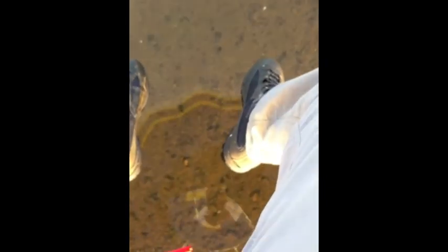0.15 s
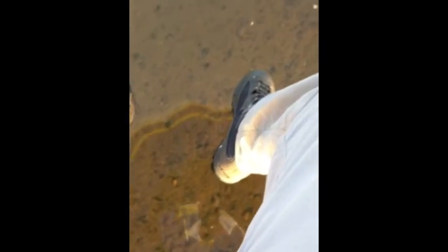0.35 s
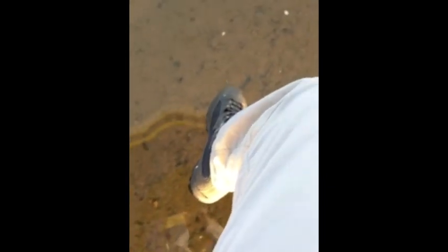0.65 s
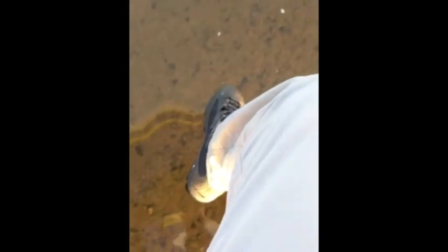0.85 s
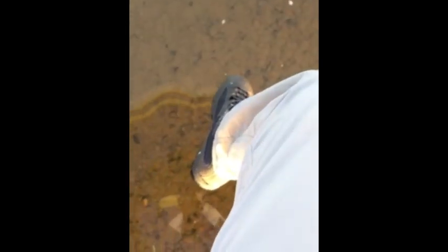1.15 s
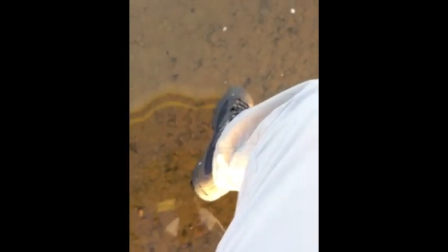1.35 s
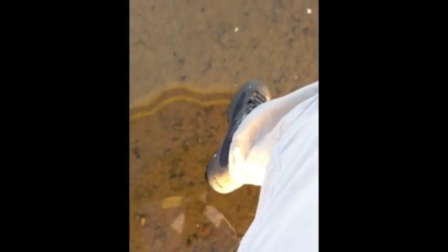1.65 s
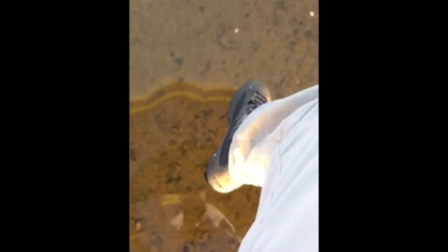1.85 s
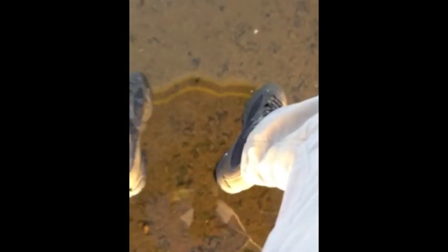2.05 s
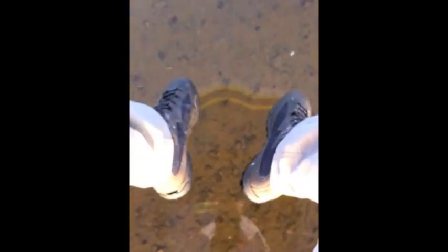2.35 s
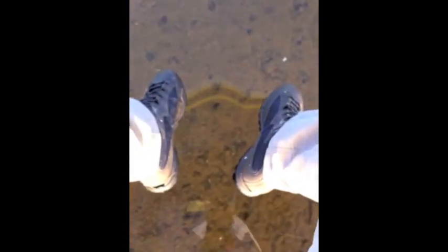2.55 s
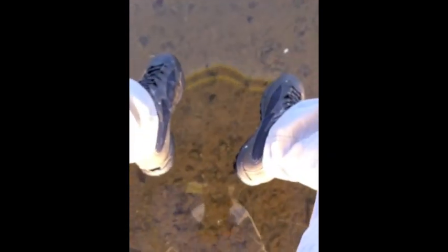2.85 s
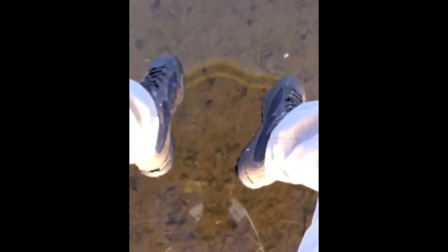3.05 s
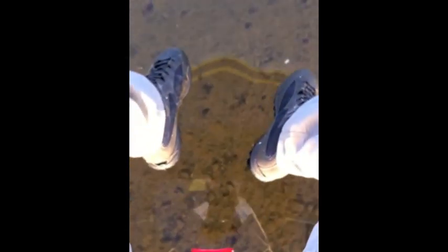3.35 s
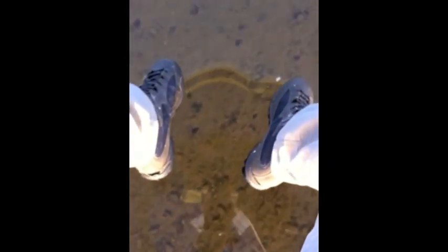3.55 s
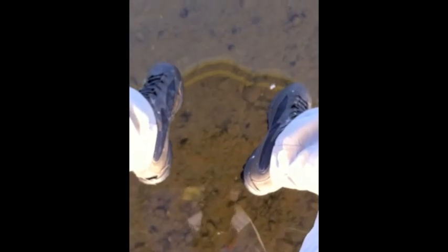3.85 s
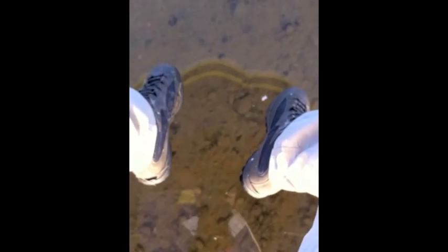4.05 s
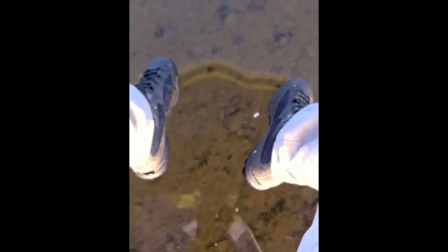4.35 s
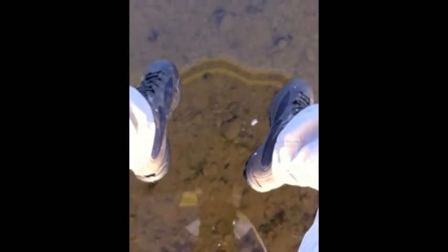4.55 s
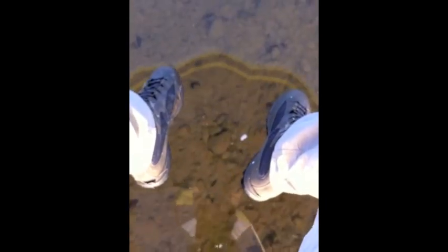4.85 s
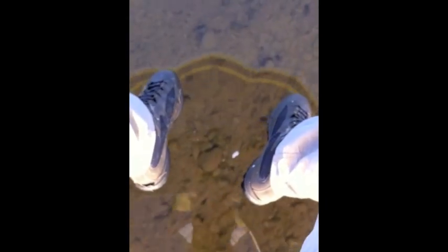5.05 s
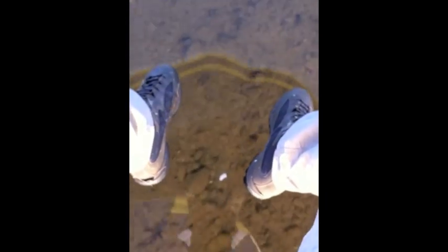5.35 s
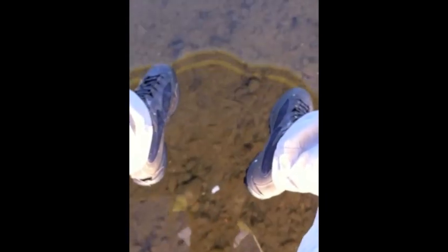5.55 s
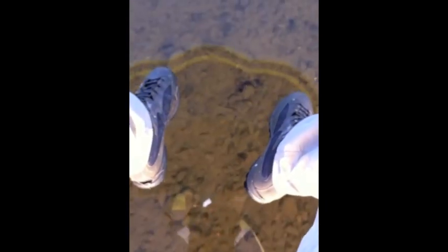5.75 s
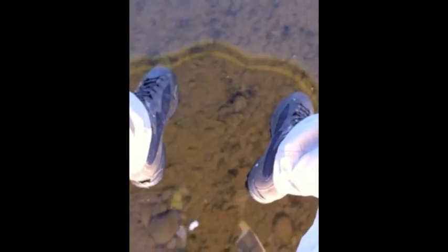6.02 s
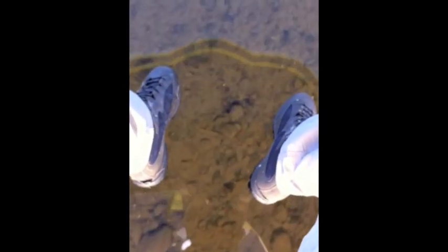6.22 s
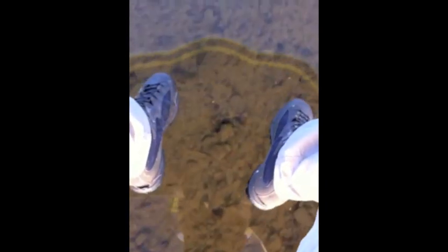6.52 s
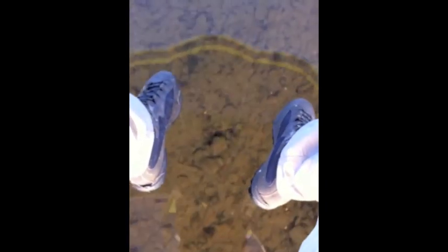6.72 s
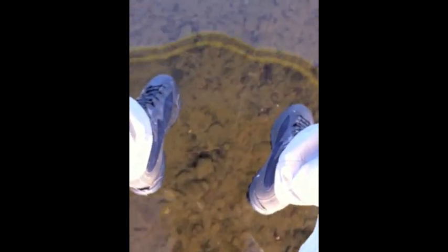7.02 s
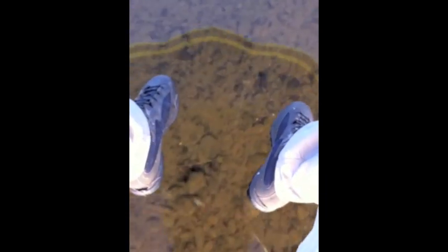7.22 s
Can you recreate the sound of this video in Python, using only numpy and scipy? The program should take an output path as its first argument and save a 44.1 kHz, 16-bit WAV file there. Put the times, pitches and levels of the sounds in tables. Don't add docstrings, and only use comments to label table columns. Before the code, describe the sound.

Repeated propane burner bursts outdoors: deep flame roar with rushing gas and high hiss, sharp ignition puffs, and two faint leaks between blasts.

```python
import sys
import numpy as np
from scipy import signal
from scipy.fft import rfft, irfft, next_fast_len
from scipy.io import wavfile
from scipy.ndimage import uniform_filter1d

SR = 44100
rng = np.random.default_rng(int(sys.argv[2]) if len(sys.argv) > 2 else 0)


def wav_out(sig):
    wavfile.write(sys.argv[1], SR, np.round(np.clip(np.atleast_2d(sig).T, -1, 1) * 32767).astype(np.int16))


def boost(x):
    u = np.asarray(x, float) / 20
    return 10 ** u


N = 325458
TIME = np.arange(N) / SR

# flame, shear, hiss [level/dB]
FULL_BURN_DB = (-15, -33, -28)


# [f/Hz, level/dB per Hz]
FLAME_ROAR = [(35, -88.5), (60, -74), (90, -59.5), (130, -45), (200, -37), (260, -38), (350, -43.5),
              (450, -48), (600, -46.5), (750, -51.5), (950, -54), (1200, -66.5), (1600, -67),
              (4000, -104.5)]


def flame(gusts, gust_db=0.43, flicker_db=1.16):
    level_db = control(column=1) - FULL_BURN_DB[0]
    unsteady_db = gust_db * gusts + flicker_db * wobble(10, 40)
    return coloured(FLAME_ROAR) * boost(level_db + unsteady_db)


# [f/Hz, level/dB per Hz]
GAS_SHEAR = [(300, -81), (600, -56), (900, -54.5), (1200, -56), (1700, -68), (2100, -62.5), (2500, -66),
             (4000, -70), (6300, -74), (9000, -75.5), (12000, -78.5), (15600, -91)]


def shear(gusts, gust_db=0.5):
    return coloured(GAS_SHEAR) * boost(control(column=2) - FULL_BURN_DB[1] + gust_db * gusts)


# [f/Hz, level/dB per Hz]
NOZZLE_HISS = [(2500, -88), (5000, -78.5), (7500, -74), (9000, -71.5), (10500, -67.5), (12000, -64),
               (13000, -63.5), (14000, -64.5), (15500, -69)]


def nozzles(gusts, gust_db=0.53, shear_treble_db=-10.5):
    treble = boost(control(column=3))
    rush = boost(control(column=2) + shear_treble_db)
    beyond = np.sqrt(np.maximum(treble ** 2 - rush ** 2, 0.05 * treble ** 2))
    return coloured(NOZZLE_HISS) * beyond * boost(gust_db * gusts - FULL_BURN_DB[2])


# [t/s, peak level/dB, pitch f/Hz, length t/s]
GAS_POCKETS = [
    (.112, -13, 234, .005),
    (2.606, -15, 205, 0.0035),
    (2.866, -8.5, 270, .006),
    (3.095, -6.5, 237, .006),
    (3.453, -7.5, 210, 0.0058),
    (4.628, -15, 202, .007),
    (4.772, -13.5, 230, 0.0055),
    (6.018, -7.5, 197, 0.0043),
    (4.622, -21.5, 80, 0.0072),
]


def puffs():
    thump = np.zeros(N)
    for s, db, hz, length in GAS_POCKETS:
        at, t = round(s * SR), TIME[:4000]
        swell = (t / length * np.exp(1 - t / length)) ** 2
        thump[at:at + len(t)] += boost(db) * swell * np.sin(2 * np.pi * hz * t)
    return thump


# [start t/s, end t/s, level/dB]
HALF_SHUT = [
    (4.18, 4.62, -41.5),
    (5.77, 6.0, -44),
]


def leaking():
    gain = np.zeros(N)
    for start, end, db in HALF_SHUT:
        gain += boost(db) * np.interp(TIME, [start - 0.04, start, end, end + 0.02], [0, 1, 1, 0])
    return gain


# [f/Hz, level/dB per Hz]
LEAK_COLOURS = [
    [(29, -65), (50, -38), (222, -2), (318, -5.5), (367, -13), (434, -3), (478, -21), (719, -9),
     (1250, -22.5), (1710, -22), (1920, -27.5), (9620, -32), (15600, -45)],
    [(29, -70), (50, -40), (131, 0), (238, -9), (303, 4), (367, -10), (914, -9), (1310, -25), (3260, -19.5),
     (3590, -26), (3860, -25.5), (9620, -26.5), (15600, -35)],
]


def leak(trim_db=0.5, flicker_db=0.6):
    first, second = (rush / np.std(rush) for rush in map(coloured, LEAK_COLOURS))
    rush = np.where(TIME < HALF_SHUT[0][1] + 0.5, first, second)
    return rush * leaking() * boost(trim_db + flicker_db * wobble(3.5, 27))


CRACK_S, CRACK_DB = 0.05, -10.7
OPEN_BEND, SAG_BEND, SHUT_KNEE_S = 1.68, 2.12, 0.092
WIDE_DB, FOLLOWS = (-14, -34.4, -28), (0.14, 0.39, 1.01)
SILENT_DB, CRACK_BEND = (-47, -30, -41.6), (2.4, 2.9, 2.07)
LAG_DB = (-3, 0.2, 1.5)
SEAL_S = (0.001, 0.003, 0.013)
DYING_DB_PER_S = (313, 249, 158)


def pull(t, k, opens, widest, top_db, shuts, end_db):
    closed = np.clip(1 - (t - opens) / CRACK_S, 0, 9)
    rising = np.clip((widest - t) / (widest - opens - CRACK_S), 0, 1) ** OPEN_BEND
    sagging = np.maximum((t - widest) / (shuts - widest), 0) ** SAG_BEND
    flow_db = top_db + (CRACK_DB - top_db) * rising + (end_db - top_db) * sagging
    late = np.maximum(t - shuts, 0)
    sealed_db = -60 * (t < opens + SEAL_S[k])
    opening_db = LAG_DB[k] * rising + SILENT_DB[k] * closed ** CRACK_BEND[k] + sealed_db
    dying_db = DYING_DB_PER_S[k] * late ** 2 / (late + SHUT_KNEE_S)
    return WIDE_DB[k] + FOLLOWS[k] * flow_db + opening_db - dying_db


DIP_S, DIP_DB, RECOVER_S = 5.405, -5.1, 0.061
REST_DB = (-54.6, -73.9, -78.8)
# [opens t/s, widest t/s, gas flow level/dB, let go t/s, flow by then level/dB]
VALVE_PULLS = [(-.7, -.606, -.9, -.119, -16), (.082, .195, .8, .69, -18), (.855, .968, 3.1, 1.46, -17.7),
               (1.621, 1.772, .6, 2.231, -19.5), (2.581, 2.698, -.4, 3.202, -20.9),
               (3.42, 3.55, -.4, 4.155, -18.6), (4.594, 5.177, -3, 5.714, -20.1),
               (5.98, 6.168, -2.3, 6.806, -15.5), (6.735, 6.883, -1.1, 7.359, -11.4),
               (7.265, 7.393, -2.7, 7.9, -20)]
# [t/s, half length t/s, flame level/dB, gas level/dB]
FLARES_AND_LULLS = [(.15, .035, -5, -.5), (.9, .035, -3, -.3), (1.66, .05, -4.5, -.3), (.36, .1, 2, .1),
                    (1.817, .069, -1.3, 2.9), (1.894, .036, -4, -2.1), (2.753, .1, 1.8, 3.1),
                    (3.74, .2, 1.5, .8), (4.85, .25, -2, .1), (1.08, .15, -1, -1.2), (4.08, .12, .5, 1.5),
                    (3.456, .024, 5, .6), (3.491, .037, -3.4, .2), (4.635, .022, 10, 4.5),
                    (4.669, .084, -5.1, -3.7), (5.39, .08, 2.9, .7), (6.111, .022, 6.6, 1.4),
                    (6.143, .052, -3.4, -.7), (6.604, .052, 2.6, 1.1)]


def control(column):
    t, k = TIME[::32], column - 1
    db = np.max([pull(t, k, *row) for row in VALVE_PULLS], axis=0)
    db = db + DIP_DB * (t > DIP_S) * np.exp(-abs(t - DIP_S) / RECOVER_S)
    for s, half_s, flame_db, gas_db in FLARES_AND_LULLS:
        surge_db = gas_db if k else flame_db
        db = db + surge_db * np.maximum(1 - abs(t - s) / half_s, 0)
    return np.interp(TIME, t, 10 * np.log10(boost(db) ** 2 + boost(REST_DB[k]) ** 2))


def wobble(lo_hz, hi_hz):
    hz, coarse = np.geomspace(lo_hz, hi_hz, 24)[:, None], TIME[::64]
    phase = hz * coarse + rng.random(hz.shape)
    waves = (np.sin(2 * np.pi * phase) / np.sqrt(hz)).sum(0)
    return np.interp(TIME, coarse, waves / np.std(waves))


def coloured(spectrum):
    size = next_fast_len(N)
    hz, db = np.transpose(spectrum)
    gain = boost(np.interp(np.log(np.fft.rfftfreq(size, 1 / SR) + 1), np.log(hz), db))
    return irfft(rfft(rng.standard_normal(size)) * gain, size)[:N] * np.sqrt(SR / 2)


def scene():
    gusts = wobble(6, 30)
    mono = flame(gusts) + shear(gusts) + nozzles(gusts) + puffs() + leak()
    return np.array([mono, mono])


# [f/Hz, rarity/spreads]
DROPOUT_RARITY = [(1200, 5), (2500, 2.6), (4800, 1.9), (8200, 1.9), (10500, 2.5), (15000, 2.3)]


def wavering_bands(x, grain_db=1.4, hole_db=-20):
    hz, _, z = signal.stft(x, SR, nperseg=1024, noverlap=768)
    field = rng.standard_normal(z.shape[::-1]).T
    field = uniform_filter1d(uniform_filter1d(field, size=2, axis=0), size=16, axis=1)
    field *= np.clip(hz / 1000, 0, 1)[:, None] / np.std(field)
    rarity = np.interp(hz, *np.transpose(DROPOUT_RARITY))[:, None]
    holes = uniform_filter1d(1. * (field < -rarity), size=2, axis=0) > 0
    wavering = z * boost(grain_db * field + hole_db * holes)
    return signal.istft(wavering, SR, nperseg=1024, noverlap=768)[1][:N]


# [t/s, low f/Hz, high f/Hz, level/dB]
EAR_SPLITS = [
    (1.09, 10300, 13300, -30),
    (2.02, 6900, 8300, -46),
    (2.16, 11000, 12400, -49),
    (2.74, 14500, 15700, -38),
    (4.85, 10300, 12400, -39),
    (5.04, 13000, 15200, -39),
    (5.67, 9600, 11000, -56),
]


def splits(half_s=0.019):
    side = np.zeros(N)
    for s, lo_hz, hi_hz, db in EAR_SPLITS:
        band = coloured([(lo_hz * 0.98, -90), (lo_hz, 0), (hi_hz, 0), (hi_hz * 1.02, -90)])
        fade = np.cos(np.pi / 2 * np.clip((TIME - s) / half_s, -1, 1))
        side += boost(db) * band / np.std(band) * fade
    return np.array([side, -side])


def band_limit(x):
    return signal.sosfilt(signal.butter(12, 15700, fs=SR, output="sos"), x)


def record(dry):
    ceiling = 0.75
    limited = dry[0] / (1 + abs(dry[0] / ceiling) ** 4) ** (1 / 4)
    mix = wavering_bands(limited) + splits()
    return band_limit(mix)


dry = scene()
out = record(dry)
wav_out(out)
```